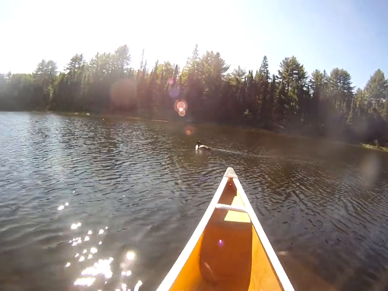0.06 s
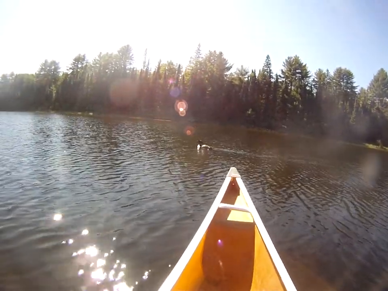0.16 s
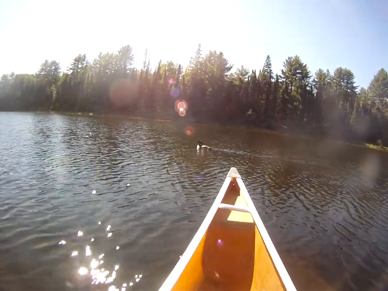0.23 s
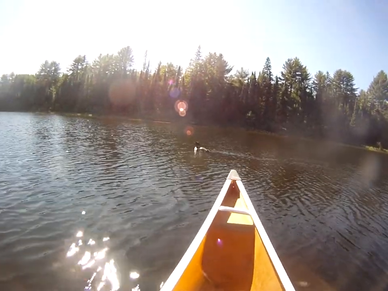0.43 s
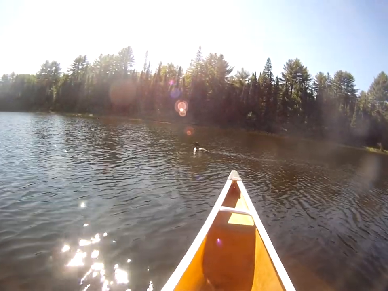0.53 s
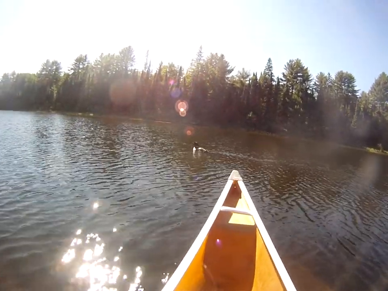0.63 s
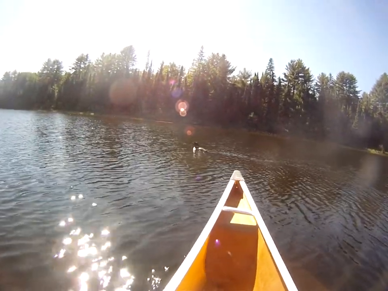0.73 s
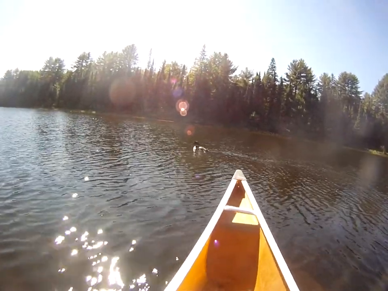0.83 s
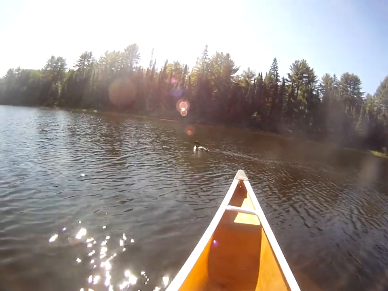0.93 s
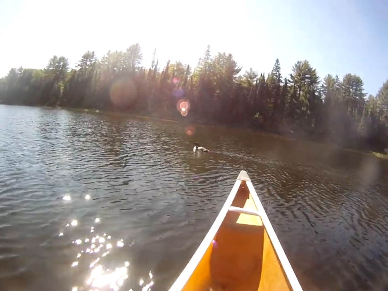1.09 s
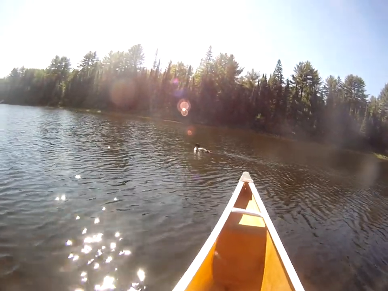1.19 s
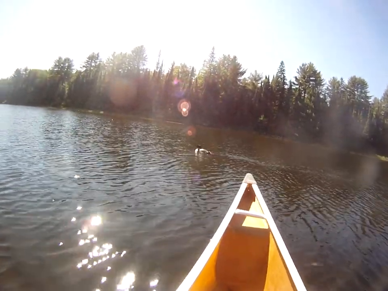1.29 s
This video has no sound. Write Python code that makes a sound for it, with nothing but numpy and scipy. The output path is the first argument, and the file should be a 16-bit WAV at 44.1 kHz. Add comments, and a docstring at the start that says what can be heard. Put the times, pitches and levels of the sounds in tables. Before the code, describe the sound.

A loon's clear wail slides up, leaps higher, then drops back over a quiet lake

```python
"""A quiet lake with a wooded shore, heard from a canoe: a loon wails once.
The call is one clean oscillator that slides up, breaks twice into higher registers and drops back.
The far shore answers faintly with delayed, dulled copies and a long noise tail.
Coloured noise makes the hush, the breeze on the microphone and the wash at the hull; a sagging tone gulps.
A low-rate sample-and-hold mirrors the sound high in the treble."""
import sys
import numpy as np
from scipy import signal
from scipy.fft import rfft, irfft, next_fast_len
from scipy.io import wavfile
from scipy.ndimage import map_coordinates

SR = 44100
rng = np.random.default_rng(int(sys.argv[2]) if len(sys.argv) > 2 else 0)


def to_wav(s):
    """Save 16-bit WAV."""
    ch = np.atleast_2d(s).T  # columns
    pcm = np.round(np.clip(ch, -1, 1) * 32767)  # PCM
    wavfile.write(sys.argv[1], SR, pcm.astype(np.int16))


N = 59535  # samples

# Hush of the lake. Each row: frequency in Hz, relative density in dB per Hz.
AIR_COLOUR = [(15, -22), (25, 3), (228, -6), (306, -5.5), (659, -11.5), (772, -16), (884, -14), (990, -17),
              (1080, -17), (2920, -21.5), (5500, -26.5), (7150, -53), (12100, -120)]
# Breeze on the microphone. Each row: frequency in Hz, relative density in dB per Hz.
BREEZE_COLOUR = [(20, -4), (45, 0), (100, -7.5), (200, -14), (500, -42.5)]
# The breeze coming and going. Each row: time in seconds, rms level in dB.
BREEZE_LEVEL = [(0, -65), (.25, -62.5), (.46, -54), (.62, -57.5), (.73, -67.5), (1.35, -67.5)]
# Water along the hull. Each row: frequency in Hz, relative density in dB per Hz.
WASH_COLOUR = [(60, -14), (250, -1), (650, 2), (1400, -13.5), (2800, -9), (3650, -16.5), (4020, -7),
               (4400, -20.5), (5500, -25)]
# The wash over time. Each row: time in seconds, rms level in dB.
WASH_LEVEL = [(0, -85.5), (1.1, -78), (1.18, -68.5), (1.25, -58), (1.35, -61)]
# Banks of the shore. Each row: echo delay in seconds, level in dB against the call.
BANK_ECHOES = [(.3256, -34.5), (.372, -43.5), (.456, -40.5), (.595, -41)]
# Swelling and fading of the far echo. Each row: time in seconds, gain in dB.
ECHO_SWELL = [(.88, 2), (.96, 0.5), (1.01, -7), (1.055, 7.5), (1.09, -5.5), (1.15, 3.5), (1.18, -2),
              (1.28, 2), (1.35, 0)]
# The wail, one table a register. Each row: time in seconds, pitch in Hz,
# level of the fundamental in dB, level of the octave in dB.
OPENING = [(0.152, 464, -46.5, -48), (0.165, 487.4, -41.2, -41.5), (0.185, 522.6, -37, -44),
           (0.205, 561, -32.5, -47), (0.218, 598, -32.5, -56)]
RISE = [(0.232, 707.5, -28.5, -48.5), (0.26, 720.8, -27, -45), (0.31, 743.8, -25, -43.9),
        (0.4, 770, -23, -44), (0.48, 787.4, -22.0, -41), (0.55, 803, -22.5, -39),
        (0.572, 826.3, -23.5, -45)]
CREST = [(0.59, 993.8, -23.5, -53), (0.65, 990, -23.5, -54.5), (0.72, 978.8, -24, -57),
         (0.79, 958, -24, -63.5), (0.815, 947, -25, -74.5), (0.833, 939.5, -27, -71.0)]
FALL = [(0.848, 713, -27, -44.5), (0.865, 699.5, -28.7, -47.5), (0.905, 670, -31.5, -42.5),
        (0.926, 645.5, -34.3, -45.5), (0.941, 607, -38.2, -59.4)]
# Upper overtones of each register. Each row: multiple of the pitch,
# level in dB over the octave at the register's start, the same at its end.
OPENING_OVERTONES = [(3, -26, -17)]
RISE_OVERTONES = [(3, -20.5, -11), (4, -18, -20.5), (5, -33.5, -31.5), (6, -41, -17), (7, -37, -17),
                  (8, -41, -39)]
CREST_OVERTONES = [(3, -1.5, 1.5), (4, -19.5, -14.5), (5, -4, 0), (6, -19.5, -2.5)]
FALL_OVERTONES = [(3, -26, -31), (5, -29, -28.5), (8, -28, -44)]
# Breaks between registers. Each row: time in seconds, glide constant in seconds, depth of the dip in dB.
BREAKS = [(0.223, .0016, 2.5), (0.5807, .0014, 5), (0.8401, 0.00048, 3)]

AIR_DB = -58.5  # rms level of the hush

GULP_S, GULP_LENGTH_S, GULP_DB, GULP_ROUGHNESS = 1.226, 0.054, -48.5, 0.62
GULP_START_HZ, GULP_END_HZ, GULP_SAG_S = 418.2, 223.4, 0.015

NEAR_DB, NEAR_T60_S = -23, 0.2  # scatter from the hull and the water
SHORE_DB, SHORE_T60_S, SHORE_DULL_HZ = -36, 8.6, 1480  # scatter from the trees

START_S, ATTACK_S, END_S, RELEASE_S = 0.1427, 0.01, 0.95, 0.0076
END_HZ = 555  # the pitch droops as the call stops
DIP_S = 0.0023  # half width of the dip at a break
PITCH_JITTER, SHIMMER_DB, OVERTONE_WOBBLE_DB = 0.00044, 0.06, 0.73  # jitter as a fraction of the pitch
THROAT_HZ, THROAT_WIDTH_HZ, THROAT_DB = 3074, 80, 10  # narrow resonance that the overtones sweep through
FLUTTER_HZ, FLUTTER_DEPTH, FLUTTER_DECAY_S = 235, 0.2, 0.018  # shiver after the leap to the crest
SQUEAK_S, SQUEAK_HZ, SQUEAK_DB, SQUEAK_LENGTH_S = 0.841, 3120, -56.5, 0.014  # at the last break

HOLD_HZ, INPUT_EDGE_HZ, TOP_HZ = 12000, 6040, 15280  # hold rate, low-pass before it, band limit after it
MIRROR_DB = 0.5  # strength of the mirror images before the hold dulls them


def amp(db):
    """Decibels to gain."""
    return 10 ** (np.asarray(db) / 20)


def unit(x):
    """Scale a signal to rms 1."""
    return x / np.sqrt(np.mean(x ** 2) + 1e-20)


def curves(rows):
    """Interpolate each column after the time to one value per sample."""
    times, *columns = np.transpose(rows)
    t = np.arange(N) / SR
    return np.array([np.interp(t, times, column) for column in columns])


def wobble(rate):
    """A smooth random curve with rate knots a second."""
    knots = rng.standard_normal(int(N * rate / SR) + 4)
    return map_coordinates(knots, [np.arange(N) * rate / SR])


def arch(start, length):
    """A half-sine envelope, start and length in seconds."""
    return np.sin(np.pi * np.clip((np.arange(N) / SR - start) / length, 0, 1))


def filtered(x, response):
    """Multiply the spectrum of x by a response of frequency in Hz."""
    size = next_fast_len(N + SR // 2)
    spectrum = rfft(x, size) * response(np.fft.rfftfreq(size, 1 / SR))
    return irfft(spectrum, size)[:N]


def noise(colour):
    """Noise of rms 1, coloured along a logarithmic frequency axis."""
    f, db = np.transpose(colour)

    def response(hz):
        return amp(np.interp(np.log(hz + 1), np.log(f), db))

    return unit(filtered(rng.standard_normal(N), response))


def scatter(x, t60):
    """Smear x through a dense noise tail that falls 60 dB in t60 seconds."""
    tail = rng.standard_normal(N) * amp(-60 * np.arange(N) / SR / t60)
    return signal.fftconvolve(x, tail / np.linalg.norm(tail))[:N]


def air():
    """Steady hush of the lake and a light breeze on the microphone, both coloured noise."""
    hush = amp(AIR_DB) * noise(AIR_COLOUR)
    breeze = amp(curves(BREEZE_LEVEL)[0]) * noise(BREEZE_COLOUR)
    return hush + breeze


def water():
    """A small wave washes along the canoe as noise, with one low rough gulp that sags in pitch."""
    since = np.maximum(np.arange(N) / SR - GULP_S, 0)
    hz = GULP_END_HZ + (GULP_START_HZ - GULP_END_HZ) * np.exp(-since / GULP_SAG_S)
    tone = np.sin(2 * np.pi * np.cumsum(hz) / SR)
    gulp = arch(GULP_S, GULP_LENGTH_S) * (1 + GULP_ROUGHNESS * wobble(300)) * tone
    wash = amp(curves(WASH_LEVEL)[0]) * noise(WASH_COLOUR)
    return amp(GULP_DB) * gulp + wash


def lake(call):
    """Short scatter near the boat; the far shore returns dull echoes and a long tail that swell and fade."""
    def bank_response(hz):
        return sum(amp(db) * np.exp(-2j * np.pi * hz * delay) for delay, db in BANK_ECHOES)

    near = amp(NEAR_DB) * scatter(call, NEAR_T60_S)
    trees = amp(SHORE_DB) * scatter(call, SHORE_T60_S)
    far = (filtered(call, bank_response) + trees) * amp(curves(ECHO_SWELL)[0])
    return near + filtered(far, lambda hz: 1 / (1 + (hz / SHORE_DULL_HZ) ** 4))


def loon():
    """One oscillator flips between registers, dipping at each break; upper overtones follow the octave."""
    t = np.arange(N) / SR
    # Each register's share rises at the break before it and falls at the break after it
    passed = [1] + [0.5 + 0.5 * np.tanh((t - s) / glide / 2) for s, glide, _ in BREAKS] + [0]
    shares = [before - after for before, after in zip(passed, passed[1:])]
    drooping_fall = [*FALL, (END_S, END_HZ, *FALL[-1][2:])]
    registers = [(OPENING, OPENING_OVERTONES), (RISE, RISE_OVERTONES),
                 (CREST, CREST_OVERTONES), (drooping_fall, FALL_OVERTONES)]

    hz, level_db, octave_db = sum(share * curves(rows) for share, (rows, _) in zip(shares, registers))
    phase = 2 * np.pi * np.cumsum(hz * (1 + PITCH_JITTER * wobble(150))) / SR
    voice = amp(level_db) * np.sin(phase) + amp(octave_db) * np.sin(2 * phase)
    for share, (rows, overtones) in zip(shares, registers):
        for multiple, first_db, last_db in overtones:
            drift_db = np.interp(t, [rows[0][0], rows[-1][0]], [first_db, last_db])
            throat_db = THROAT_DB * np.exp(-((multiple * hz - THROAT_HZ) / THROAT_WIDTH_HZ) ** 2)
            overtone_db = octave_db + drift_db + throat_db + OVERTONE_WOBBLE_DB * wobble(20)
            voice += share ** 2 * amp(overtone_db) * np.sin(multiple * phase)

    gate = np.clip((t - START_S) / ATTACK_S, 0, 1) * np.clip((END_S - t) / RELEASE_S, 0, 1)
    dip_db = sum(db * np.exp(-((t - s) / DIP_S) ** 2) for s, _, db in BREAKS)
    shimmer = amp(SHIMMER_DB * wobble(100) - dip_db)
    since_leap = np.maximum(t - BREAKS[1][0], 0)
    shiver = np.exp(-since_leap / FLUTTER_DECAY_S) * np.sin(2 * np.pi * FLUTTER_HZ * since_leap)
    flutter = 1 + FLUTTER_DEPTH * shiver
    squeak = amp(SQUEAK_DB) * arch(SQUEAK_S, SQUEAK_LENGTH_S) * np.sin(2 * np.pi * SQUEAK_HZ * t)
    # The root of 2 makes the tabled levels rms levels
    return np.sqrt(2) * voice * gate * flutter * shimmer + squeak


def scene():
    """The call, its echoes and the quiet around the canoe, in one channel."""
    call = loon()
    return (call + lake(call) + water() + air())[None]


def record(dry):
    """Sample-and-hold mirrors the sound on both sides of the hold rate, up to a band limit."""
    narrow = filtered(dry[0], lambda hz: 1 / (1 + (hz / INPUT_EDGE_HZ) ** 20))
    carrier = np.cos(2 * np.pi * HOLD_HZ * np.arange(N) / SR)
    mirrored = narrow * (1 + 2 * amp(MIRROR_DB) * carrier)
    # The flat steps of the hold dull the treble as a sinc
    return filtered(mirrored, lambda hz: np.sinc(hz / HOLD_HZ) * (hz < TOP_HZ))[None]


dry = scene()
out = record(dry)
to_wav(out)
```